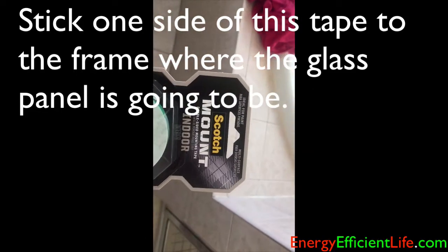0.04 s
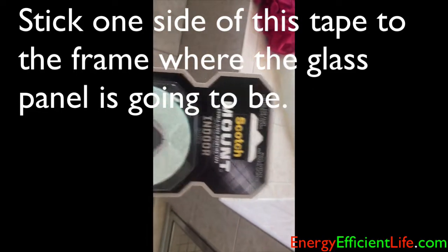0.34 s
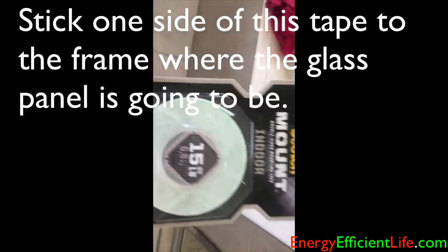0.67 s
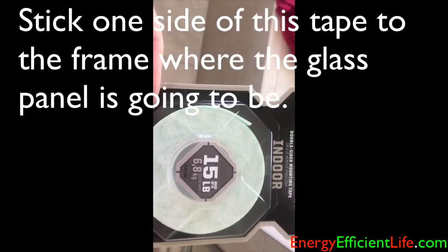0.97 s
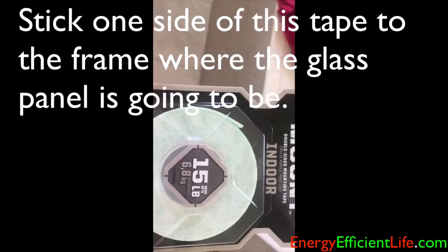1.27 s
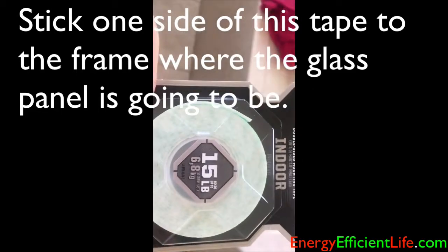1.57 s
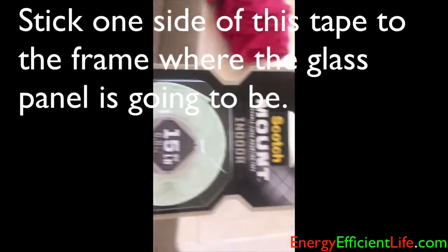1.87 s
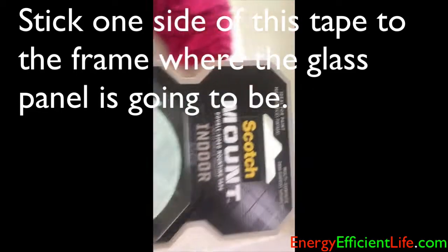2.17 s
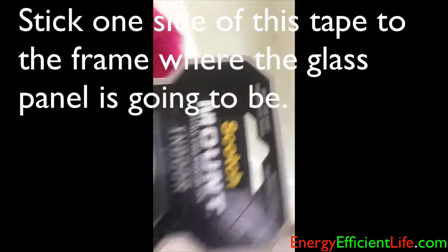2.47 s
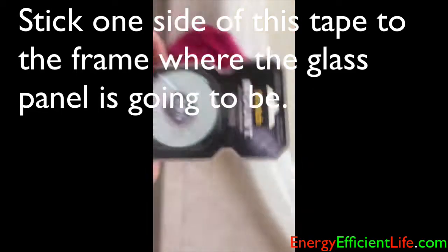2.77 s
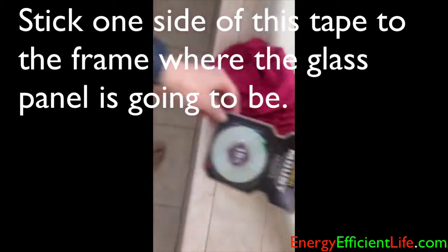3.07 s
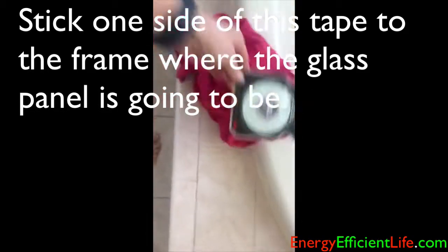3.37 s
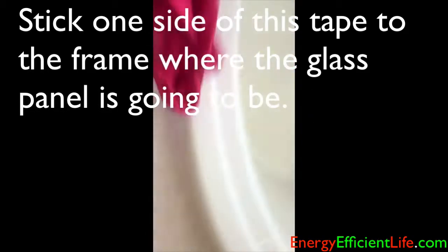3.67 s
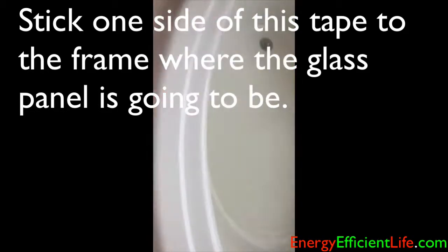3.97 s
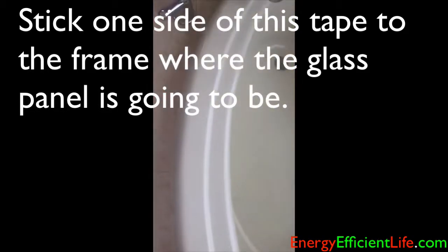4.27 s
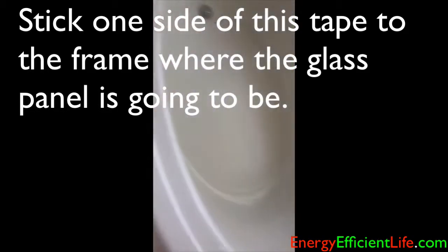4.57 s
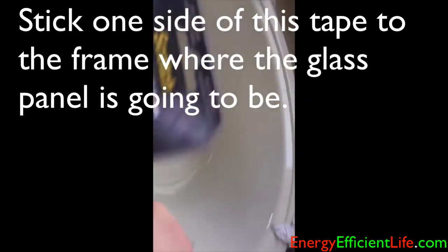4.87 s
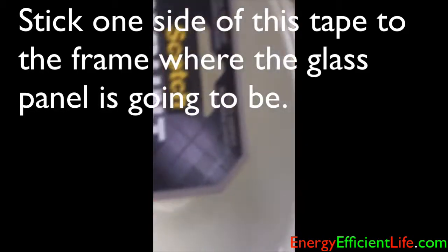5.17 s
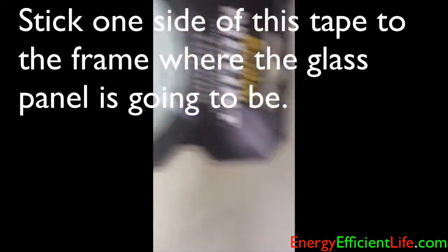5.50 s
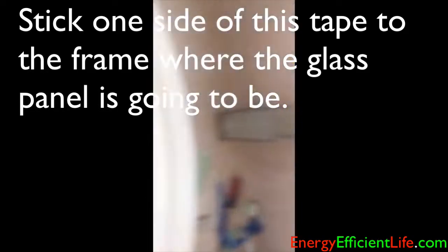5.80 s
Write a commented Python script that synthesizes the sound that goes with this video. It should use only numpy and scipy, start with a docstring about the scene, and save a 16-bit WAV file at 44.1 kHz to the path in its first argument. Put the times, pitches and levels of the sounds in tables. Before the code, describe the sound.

In a quiet bathroom, a plastic pack of tape is handled close to the microphone. Cloth rustles faintly over a low rumble while the thin plastic clicks, taps and briefly scrapes. A soft bump nudges the microphone. Near the end the pack knocks twice on the bathtub, which gives a deep hollow boom as the pack clatters and slides. The tiled walls add a short echo.

```python
"""In a quiet bathroom, a plastic pack of mounting tape is carried to the bathtub and put down.
Over a low rumble and a faint hum, cloth rustles as the arm moves. The thin plastic clicks as it bends,
and the pack is brushed, tapped and dragged. A soft bump nudges the microphone. Near the end, two knocks
set the hollow tub booming while the pack clatters and slides on it. Tiled walls echo the sharp sounds."""
import sys
import numpy as np
from scipy import signal
from scipy.fft import rfft, irfft, next_fast_len
from scipy.io import wavfile
from scipy.ndimage import map_coordinates

SR = 44100
rng = np.random.default_rng(int(sys.argv[2]) if len(sys.argv) > 2 else 0)


def inscribe(sig):
    """Save sig as 16-bit PCM at rate SR to the path in sys.argv[1].

    A 1-D sig is mono; a 2-D sig holds one channel per row.
    Samples are clipped to [-1, 1] before scaling.
    """
    pcm = np.round(np.clip(np.atleast_2d(sig).T, -1, 1) * 32767)
    wavfile.write(sys.argv[1], SR, pcm.astype(np.int16))


N = 257544
TOP_HZ = 15850  # the highest pitch the microphone picks up

# Levels in the tables are relative. A fade (t60) is the time a sound takes to drop by 60 dB.
# tone colours of the room's air and its low rumble: f/Hz, level/dB
AIR_COLOUR = [(25, -5.5), (58, 6), (85, -14.5), (125, -2.5), (200, -10), (350, -11), (500, -25),
              (900, -14.5), (2000, -34), (4000, -31), (8000, -40), (10400, -34.5), (13000, -31.5),
              (15800, -36)]
RUMBLE_COLOUR = [(25, -35), (45, -13.5), (58, 6.5), (80, -5), (160, -22), (600, -76.5)]
# moments when the rumble swells: middle t/s, boost/dB
RUMBLE_SWELLS = [(.55, 8.5), (1.17, 5.5), (4.24, 10)]
# how briskly the arm moves, given as loudness: t/s, level/dB
ARM_MOTION = [(0.0, -74), (0.51, -73.5), (0.84, -72), (1.0, -71.5), (1.28, -72.5), (1.83, -72), (2.3, -69),
              (2.39, -65.5), (2.68, -70), (2.8, -67), (3.08, -71.5), (3.25, -65.5), (3.45, -65.5),
              (3.86, -67.5), (4.14, -66), (4.43, -67), (5.22, -68.5), (5.43, -68)]
# tone colours of the low, middle and high parts of rubbing: f/Hz, level/dB
RUB_COLOUR = [(60, -10), (140, 5), (350, -2), (600, -6.5), (1500, -46)]
RUSTLE_COLOUR = [(250, -25.5), (700, 3), (1700, 0.5), (3500, -2.5), (6000, -8.5), (10000, -34)]
HISS_COLOUR = [(2500, -22.5), (6000, 4.5), (9000, 4.5), (10400, 1.5), (12000, 7), (15500, 4.5)]
# clicks of the thin plastic: t/s, level/dB, fade/s
PLASTIC_SNAPS = [(.834, -39, .005), (0.838, -41.5, 0.0097), (1.916, -54.5, 0.11), (2.7238, -41.5, 0.0053),
                 (2.741, -33, 0.01), (2.8605, -46, 0.04), (2.983, -50, .009), (3.087, -55, .02),
                 (3.32, -50.5, 0.046), (3.435, -48.5, 0.021), (3.595, -46.5, 0.022), (5.023, -35.5, 0.0048),
                 (5.027, -50, .035), (5.575, -42, 0.031)]
# tone colour of those clicks: f/Hz, level/dB
SNAP_COLOUR = [(300, -14), (1500, -4), (4000, -1), (6000, 0.5), (8000, 0), (12000, -0.5), (15800, 0)]
# how long the tiled room rings: f/Hz, fade/s
ROOM_FADES = [(100, 0.13), (500, 0.45), (2000, 0.57), (6000, 0.32), (15000, 0.42)]
# short swishes (wide) and faint ringing tones (narrow): t/s, length/s, f/Hz, width/octaves, level/dB
SWISHES_AND_RINGS = [(.84, 0.059, 10900, 1.3, -72.5), (1.018, .05, 12800, 1.6, -68),
                     (1.1, 0.033, 3300, 0.92, -72), (1.888, 0.14, 2800, 1.1, -70),
                     (2.198, 0.057, 11900, 2.2, -65), (2.273, 0.21, 11800, 3.3, -68),
                     (3.115, 0.32, 337, 0.064, -70.5), (3.24, 0.055, 4950, 1.6, -66.5),
                     (3.264, 0.35, 13000, 1.5, -69), (3.593, 0.047, 2800, 0.8, -64),
                     (3.88, 0.13, 1440, .55, -69.5), (4.084, .2, 4000, 0.27, -71.5),
                     (4.147, 0.14, 228, 1.2, -64), (4.234, 0.13, 11000, 1.5, -69),
                     (4.475, .07, 12000, 1.3, -69), (4.664, 0.16, 12000, 2, -71),
                     (4.978, 0.26, 674, 0.16, -72.5), (5.017, 0.036, 11600, 0.15, -66),
                     (5.66, 0.047, 14000, 1.1, -62.5)]
# the pack taps against things: t/s, level/dB, extra level for its hollow/dB, fade/s
PACK_TAPS = [(2.205, -52.5, -12, 0.031), (2.533, -39, 3, 0.043), (2.635, -53, -4, 0.011),
             (2.7247, -47.5, -12, 0.022), (2.741, -39, 0, 0.019), (2.753, -37, -8, 0.032),
             (2.989, -41, -19, 0.031), (3.253, -49, -22, 0.087), (3.592, -36.5, -11, 0.058),
             (3.62, -47.5, -0.5, .1), (4.014, -54.5, -25, 0.034), (5.046, -53.5, -3, 0.012),
             (5.464, -45.5, 4.5, 0.026), (5.552, -39.5, -19, 0.071), (5.58, -39.5, -22, .05),
             (5.646, -27, -24, 0.021)]
# ringing tones of the pack's card and plastic bubble: f/Hz, width/Hz, level/dB
CARD_TONES = [(740, 81, -7), (903, 240, 9), (1026, 130, -2), (1433, 120, 5.5), (1683, 280, 5.5),
              (2440, 410, -7), (3150, 280, -52), (4300, 280, -17), (5550, 540, -2)]
# ringing tones of the hollow in the pack: f/Hz, level/dB, fade/s
HOLLOW_TONES = [(206, -0.5, 0.054), (325, -4.5, 0.056), (426, -0.5, 0.025)]
# ringing tones of the dragged edge: f/Hz, width/Hz, level/dB
EDGE_TONES = [(1820, 320, 1), (3620, 780, -6.5), (6450, 370, -8), (8900, 680, -11), (9700, 500, -7),
              (12100, 1100, -26), (14000, 3700, -15)]
# short, dull tones of the microphone's case: f/Hz, level/dB, time to swell/s
CASE_TONES = [(67, -34.5, 0.019), (130.5, -39.5, 0.015), (221, -38.5, 0.0069), (300, -48, 0.0055)]
# knocks on the tub: t/s, clatter level/dB, boom level/dB, boom delay/s, hardness/(dB per octave)
TUB_KNOCKS = [(5.4518, -36.5, -0.5, 0.0131, 8), (5.577, -41, 5.5, 0.0022, -17.5)]
# tone colour of the rattling pack: f/Hz, level/dB
CLATTER_COLOUR = [(120, -13), (170, -6), (270, -39), (390, -2.5), (560, -13), (800, -16), (1120, -10),
                  (1400, -18), (2280, -20.5), (3000, -23.5), (3550, -18), (4300, -25.5), (5700, -19.5),
                  (7100, -31.5), (9800, -30.5), (15800, -43)]
# the pack slides after each knock: t/s, length/s, level/dB
PACK_SLIDES = [(5.464, 0.1, -2), (5.616, 0.041, 0.5)]
# ringing tones of the tub's wall: f/Hz, level/dB, fade/s
TUB_TONES = [(59.4, 4.5, 0.14), (67.9, 14.5, 0.079), (53.85, 4, 0.15), (49.1, -47, 4.2), (89.3, -28, 0.44),
             (148, -13, 0.053)]


def amp(db):
    """Turn decibels into a number to multiply by."""
    return 10 ** (np.asarray(db) / 20)


def unit(x):
    """Scale a sound to an average power of 1."""
    return x / np.sqrt(np.mean(x ** 2) + 1e-20)


def along(points, hz):
    """Read between the rows of an (f/Hz, value) table, on a scale of octaves."""
    f, values = np.transpose(points)
    return np.interp(np.log(hz + 1), np.log(f + 1), values)


def since(s):
    """Seconds since time s, and zero before it."""
    return np.maximum(np.arange(N) / SR - s, 0)


def envelope(s, length, attack_s, release_s):
    """A loudness shape: rise from time s, hold until length has passed, then die away."""
    return np.minimum(since(s) / attack_s, 1) * np.exp(-since(s + length) / release_s)


def wobble(rate):
    """A smooth curve through rate random points a second."""
    return map_coordinates(rng.standard_normal(int(N * rate / SR) + 4), [np.arange(N) * rate / SR])


def filtered(x, response):
    """Multiply each frequency in x by response(hz)."""
    size = next_fast_len(N + SR // 2)
    return irfft(rfft(x, size) * response(np.fft.rfftfreq(size, 1 / SR)), size)[:N]


def coloured(x, colour, size=4096):
    """Give x a tone colour; white noise keeps its power."""
    cepstrum = irfft(np.log(amp(along(colour, np.fft.rfftfreq(size, 1 / SR)))))
    cepstrum[1:size // 2] *= 2  # fold the filter so that it never rings ahead of the sound
    cepstrum[size // 2 + 1:] = 0
    kernel = irfft(np.exp(rfft(cepstrum)))
    return signal.fftconvolve(x, kernel / np.linalg.norm(kernel))[:N]


def resonate(x, tones):
    """Let x ring an object's tones; the wider a tone, the sooner it dies."""
    t = np.arange(SR // 4) / SR
    ring = sum(amp(db) * width * np.exp(-np.pi * width * t) * np.cos(2 * np.pi * hz * t)
               for hz, width, db in tones)
    return signal.fftconvolve(x, ring / np.linalg.norm(ring))[:N]


def burst(s, t60, rise_s):
    """One touch at time s: noise that builds quickly and dies away."""
    t = np.arange(SR // 3) / SR
    chatter = rng.standard_normal(len(t)) * amp(-60 * t / t60) * (1 - np.exp(-t / rise_s))
    return np.pad(chatter, (round(s * SR), N))[:N]


def friction(grain_db):
    """Rubbing noise, made of tiny slips of uneven strength."""
    return unit(rng.standard_normal(N) * amp(grain_db * wobble(350)))


def arm_motion_db(usual_db=-69.5):
    """How far the arm's motion is above or below its usual level."""
    times, levels = np.transpose(ARM_MOTION)
    return np.interp(since(0), times, levels) - usual_db


def background(swell_half_width_s=0.098):
    """Still air, a faint electric hum, and an uneven rumble that grows as the arm moves."""
    t = since(0)
    air = amp(-68.5) * coloured(rng.standard_normal(N), AIR_COLOUR)
    swell_db = sum(db * np.exp(-((t - s) / swell_half_width_s) ** 2) for s, db in RUMBLE_SWELLS)
    rumble_db = -69.5 + 0.35 * arm_motion_db() + swell_db + 0.6 * wobble(2.84)
    rumble = amp(rumble_db) * coloured(rng.standard_normal(N), RUMBLE_COLOUR)
    hum = amp(-73) * np.sin(2 * np.pi * 120 * t)
    return air + rumble + hum


def rubbing(rub_db, rustle_db, hiss_db, catches_per_s=220):
    """Sliding surfaces make a muffled rub, a rustle, and a hiss that crackles where they catch."""
    rub = amp(rub_db) * coloured(friction(grain_db=0.5), RUB_COLOUR)
    rustle = amp(rustle_db) * coloured(friction(grain_db=1), RUSTLE_COLOUR)
    catches = amp(-10) * unit(rng.standard_normal(N) * (rng.random(N) < catches_per_s / SR))
    hiss = amp(hiss_db) * coloured(friction(grain_db=-1.1) + catches, HISS_COLOUR)
    return rub + rustle + hiss


def handling():
    """Hand and cloth rub louder and brighter as the arm moves faster."""
    motion_db = arm_motion_db()
    return rubbing(rub_db=-70.5 + 0.66 * motion_db,
                   rustle_db=-72 + 1.08 * motion_db,
                   hiss_db=-73 + motion_db)


def snaps(rise_share=0.018):
    """The plastic bubble bends and clicks; longer crinkles also take longer to build."""
    clicks = sum(amp(db - 3.5) * burst(s, t60, rise_share * t60) for s, db, t60 in PLASTIC_SNAPS)
    return coloured(clicks, SNAP_COLOUR)


def wall_echo(x, delay_samples=220):
    """Tiled walls throw the sound back; each frequency dies at its own speed."""
    hz, t, noise = signal.stft(rng.standard_normal(SR // 2), SR, nperseg=256)
    fade = amp(-60 * t / along(ROOM_FADES, hz)[:, None])
    tail = signal.istft(noise * fade, SR, nperseg=256)[1]
    return signal.fftconvolve(np.pad(x, (delay_samples, 0)), tail / np.linalg.norm(tail))[:N]


def swishes_and_rings():
    """Short swishes of fingers and cloth, and a few faint ringing tones, two of them hollow."""
    noise, out = friction(grain_db=1), np.zeros(N)
    for s, length, centre_hz, octaves, db in SWISHES_AND_RINGS:
        band = lambda hz: np.exp(-(np.log2((hz + 1) / centre_hz) / octaves) ** 2 / 2) * (hz < TOP_HZ)
        band_noise = unit(filtered(np.roll(noise, rng.integers(N)), band))
        out += amp(db) * envelope(s, length, attack_s=0.06 * length, release_s=0.044) * band_noise
    return out


def taps(rise_share=0.081, muffle_hz=2960, hollow_rise_s=0.0013):
    """Each tap, softened by the fingers, rings the card and pushes on the hollow of the pack."""
    contacts, pushes = np.zeros(N), np.zeros(N)
    for s, db, hollow_db, t60 in PACK_TAPS:
        contacts += amp(db) * burst(s, t60, rise_share * t60)
        pushes[round(s * SR)] += amp(db + hollow_db - 4)
    muffled = signal.lfilter(*signal.butter(2, muffle_hz, fs=SR), contacts)
    t = np.arange(SR // 4) / SR
    hollow = sum((-1) ** k * amp(db - 60 * t / t60) * np.sin(2 * np.pi * hz * t)
                 for k, (hz, db, t60) in enumerate(HOLLOW_TONES))
    hollow *= 1 - np.exp(-t / hollow_rise_s)
    return resonate(muffled, CARD_TONES) + signal.fftconvolve(pushes, hollow)[:N]


def drag(start_s=2.465, stop_s=2.562, swell_db_per_s=109):
    """The pack's edge drags ever harder, with a thin rasp, until it slips free."""
    level_db = -53.5 - swell_db_per_s * np.maximum(stop_s - since(0), 0)
    contact = envelope(start_s, stop_s - start_s, attack_s=0.006, release_s=0.0057)
    return amp(level_db) * contact * resonate(friction(grain_db=-3), EDGE_TONES)


def bump(start_s=3.8755, steepness=5):
    """A soft nudge on the microphone's case: each tone swells and is gone within a few cycles."""
    t = since(start_s)
    pressure = lambda swell_s: (t / swell_s * np.exp(1 - t / swell_s)) ** steepness
    return sum(amp(db) * pressure(swell_s) * np.sin(2 * np.pi * hz * t) for hz, db, swell_s in CASE_TONES)


def clatter():
    """The pack rattles at each knock on the tub."""
    contacts = sum(amp(db) * burst(s, t60=0.085, rise_s=0.0014) for s, db, *_ in TUB_KNOCKS)
    return coloured(contacts, CLATTER_COLOUR)


def slides():
    """The pack skids on the tub with a thin squeal and slows to rest."""
    speeds = [amp(db) * envelope(s, length, attack_s=0.0098, release_s=0.14)
              for s, length, db in PACK_SLIDES]
    squeal_tones = [(5870, 620, -1.5), (4330, 270, -1.0)]  # f/Hz, width/Hz, level/dB
    squeal = amp(-61) * resonate(friction(grain_db=-1), squeal_tones)
    return np.max(speeds, axis=0) * (squeal + rubbing(rub_db=-55, rustle_db=-58, hiss_db=-67))


def boom(swell_s=0.062):
    """The heavy tub wall swells into its deep tones; harder knocks favour the higher ones."""
    out, t = np.zeros(N + SR), np.arange(SR // 2) / SR
    swell = 1 - np.exp(-(t / swell_s) ** 2)
    for s, _, boom_db, delay, hardness in TUB_KNOCKS:
        start = round((s + delay) * SR)
        for hz, tone_db, t60 in TUB_TONES:
            tilt_db = hardness * np.log2(hz / TUB_TONES[0][0])
            ring = amp(boom_db + tone_db + tilt_db - 60 * t / t60) * np.sin(2 * np.pi * hz * t)
            out[start:start + len(t)] += swell * ring
    return out[:N]


def scene():
    """Add all the sounds into one channel; only the clicks, taps and rattle get an echo."""
    clicks, tapping, rattle = snaps(), taps(), clatter()
    echo = wall_echo(amp(-3.5) * clicks + amp(-9) * tapping + amp(-8.5) * rattle)
    soft_sounds = handling() + swishes_and_rings() + drag() + slides()
    return (clicks + tapping + rattle + echo + boom() + bump() + soft_sounds + background())[None]


def record(dry, low_cut_hz=36):
    """The microphone loses the deepest bass and everything above TOP_HZ."""
    low_cut = lambda hz: 1 / np.sqrt(1 + (low_cut_hz / (hz + 1)) ** 16)
    return filtered(dry[0], lambda hz: low_cut(hz) * (hz < TOP_HZ))[None]


dry = scene()
out = record(dry)
inscribe(out)
```